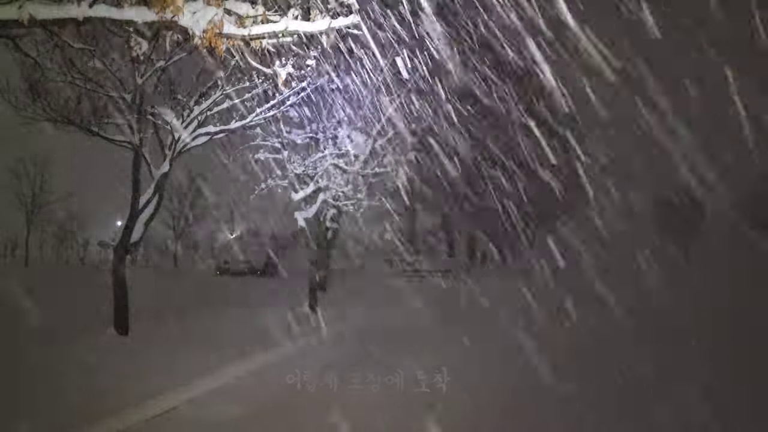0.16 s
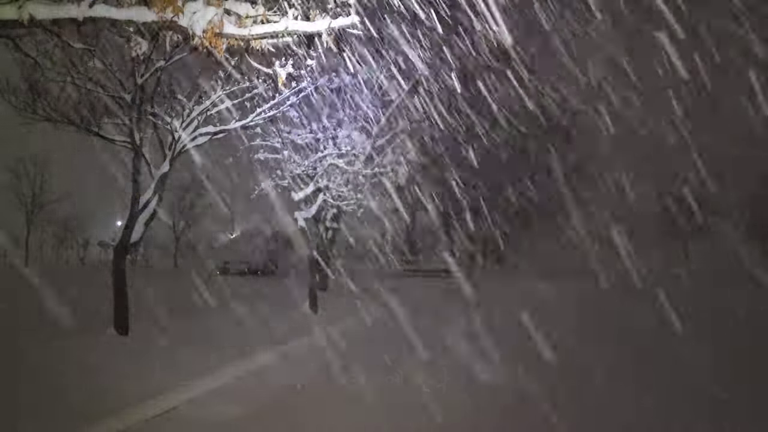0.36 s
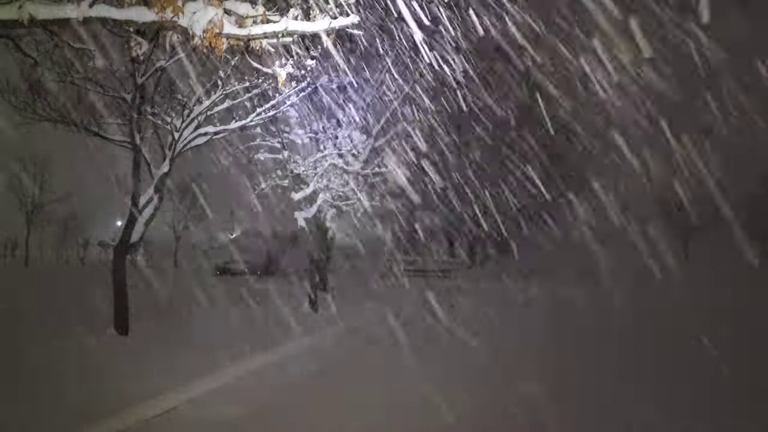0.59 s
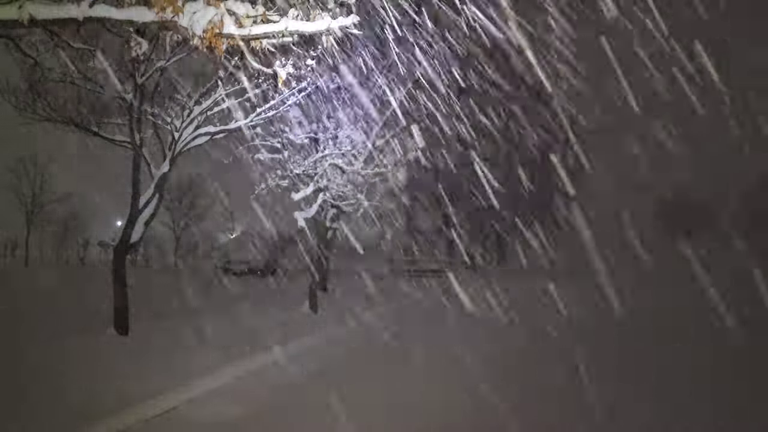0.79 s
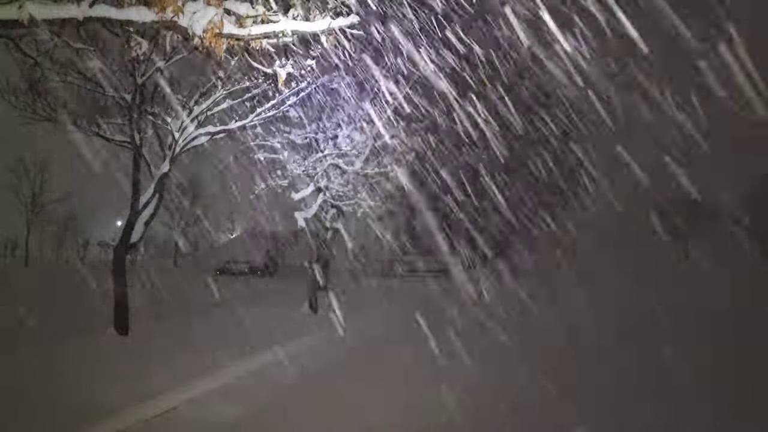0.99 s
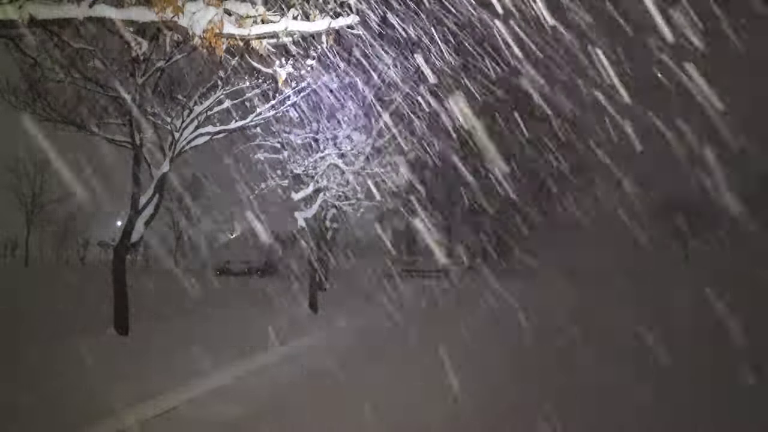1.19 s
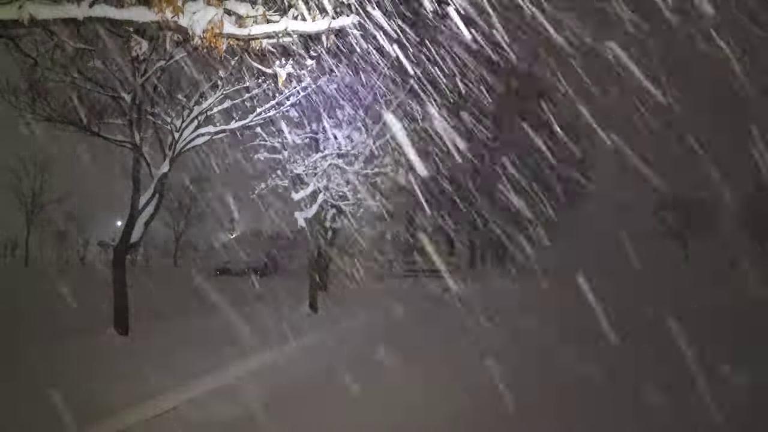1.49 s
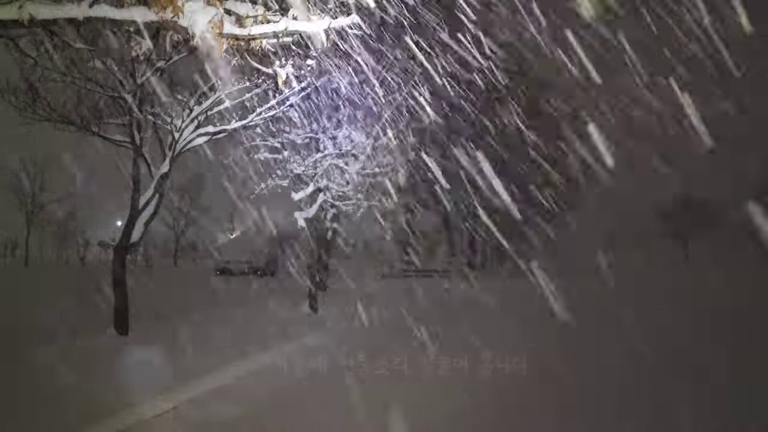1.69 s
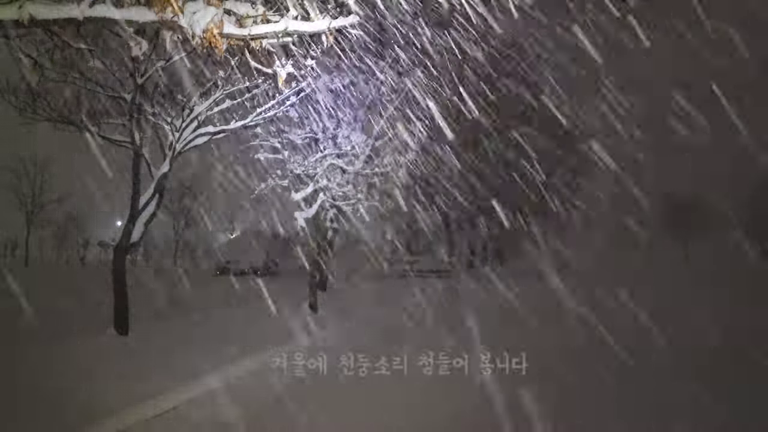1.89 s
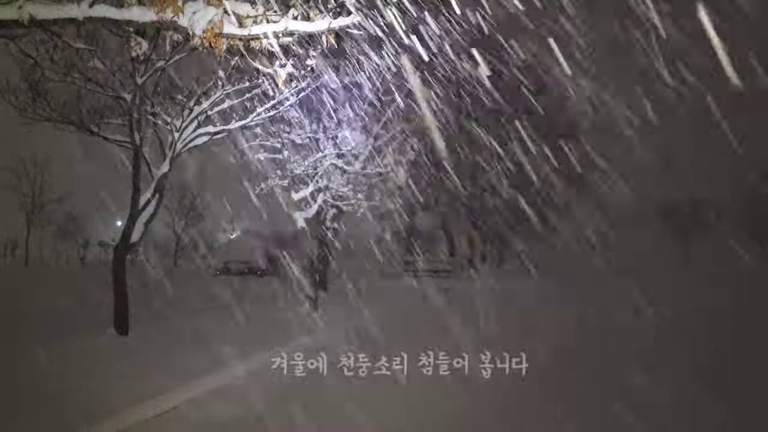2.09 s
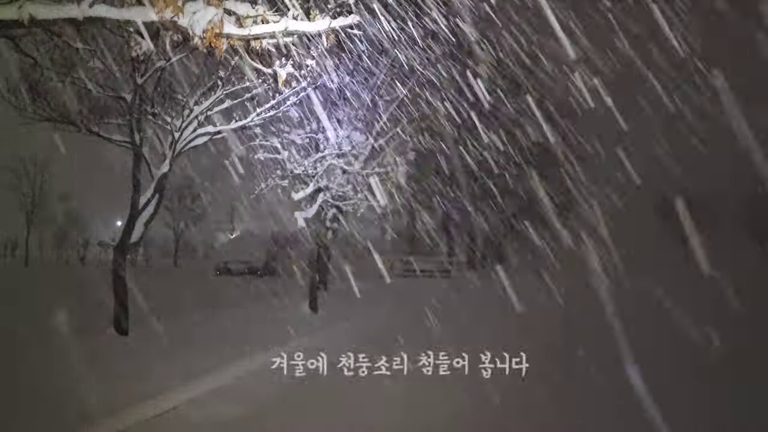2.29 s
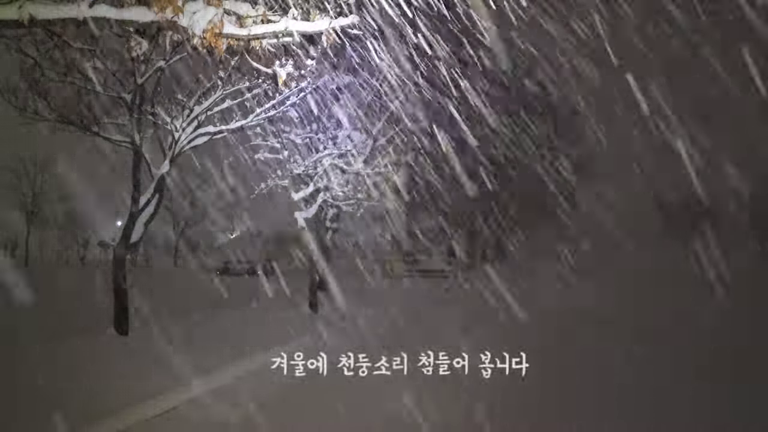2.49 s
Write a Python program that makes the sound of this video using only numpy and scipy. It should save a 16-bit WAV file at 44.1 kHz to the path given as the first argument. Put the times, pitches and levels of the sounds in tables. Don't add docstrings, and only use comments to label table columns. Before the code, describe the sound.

Thunder strikes suddenly after a brief quiet moment, with rough rips, low booms and hollow claps that roll on and fade; faint snowflake ticks and a distant low drone, outdoors at night, close stereo microphones.

```python
import sys
import numpy as np
from scipy import signal
from scipy.fft import rfft, irfft
from scipy.io import wavfile
from scipy.ndimage import uniform_filter1d

SR = 44100
rng = np.random.default_rng(int(sys.argv[2]) if len(sys.argv) > 2 else 0)


def generate_wav(signal):
    frames = np.transpose(np.atleast_2d(signal))
    scaled = np.clip(frames, -1, 1) * 32767
    pcm = np.round(scaled).astype(np.int16)
    wavfile.write(sys.argv[1], SR, pcm)


def field_ratio(decibels):
    return 10 ** (np.asarray(decibels, dtype=float) / 20)


N = 116865


def evened(x):
    return x / np.sqrt(np.mean(x ** 2) + 1e-20)


def read(points, hz):
    f, value = np.transpose(points)
    return np.interp(np.log(hz + 1), np.log(f + 1), value)


def add(mix, start_s, sound):
    part = mix[..., round(start_s * SR):][..., :sound.shape[-1]]
    part += sound[..., :part.shape[-1]]


def colour(x, points):
    level_db = np.maximum(read(points, abs(np.fft.fftfreq(16384, 1 / SR))), -100)
    log_gain = np.log(field_ratio(level_db))
    taps = np.fft.ifft(np.exp(np.conj(signal.hilbert(log_gain)))).real[:6000]
    shaped = taps.reshape((1,) * (x.ndim - 1) + (-1,))
    return signal.oaconvolve(x, shaped, axes=-1)[..., :x.shape[-1]] / np.linalg.norm(taps)


def clicks(per_s, spread_db):
    size = field_ratio(spread_db * np.minimum(rng.exponential(1, N), 5))
    sign = rng.choice([-1., 1.], N)
    return evened(size * sign * (rng.random(N) < per_s / SR))


# start_s, level_db, deep_db (low shocks over bright ones)
ROLL = [(.2, -40.5, 10), (.22, -37, 6.5), (.36, -41, 6), (.41, -41, 9), (.45, -36, 6), (.6, -34.5, 6),
        (0.646, -33.5, 3.5), (0.676, -35.5, 8.5), (.91, -42, 4), (1.03, -39, 6.5), (1.07, -38, 8.5),
        (1.2, -37.5, 9), (1.52, -41, 3.5), (1.68, -43, 4.5), (2.04, -45, 3.5), (2.07, -40.5, 9),
        (2.3, -44.5, 5), (2.65, -45.5, 2)]
# pitch_hz, level_db per Hz
DEEP_SPECTRUM = [(18, -33), (30, -9.5), (54, -8), (135, 0.5), (242, -2.5), (305, -15), (330, -29),
                 (430, -30), (730, -120)]
# pitch_hz, level_db per Hz
CRACK_SPECTRUM = [(190, -35.5), (320, -8.5), (412, -2), (589, -10.5), (724, -10), (1170, -15.5),
                  (1640, -22), (2110, -23), (5000, -54), (6500, -89), (11000, -120)]
ARRIVAL_S, ATTACK_S = 0.1878, 0.0063
SHOCKS_PER_S, SHOCK_SPREAD_DB = 1500, 2
CLUMP_DB, CLUMP_S = 1, 0.033
DEEP_DB, CRACK_DB = 1.5, 4.5
TREBLE_SAG_DB_PER_S, RING_SAG_DB_PER_S = -7.5, -4


def roll():
    t = np.arange(N) / SR
    start_s, level_db, deep_db = np.transpose(ROLL)
    width = max(int(CLUMP_S * SR), 1)
    slow = uniform_filter1d(uniform_filter1d(rng.standard_normal(N), width), width)
    clumps = evened(field_ratio(CLUMP_DB * evened(slow)))
    front = np.clip((t - ARRIVAL_S) / ATTACK_S, 0, 1)
    drive = front * field_ratio(np.interp(t, start_s, level_db)) * clumps

    deep = clicks(SHOCKS_PER_S / 2, SHOCK_SPREAD_DB) * field_ratio(DEEP_DB + np.interp(t, start_s, deep_db))
    bright = clicks(SHOCKS_PER_S * 2, SHOCK_SPREAD_DB) * field_ratio(CRACK_DB)
    crack = colour(drive * bright, CRACK_SPECTRUM) + rips()

    dull = signal.lfilter(*signal.butter(2, 1800 / (SR / 2)), crack)
    treble = (crack - dull) * field_ratio(TREBLE_SAG_DB_PER_S * (np.clip(t, .65, 1.36) - 0.6445))
    ring = signal.lfilter(*signal.iirpeak(410, 3, SR), crack)
    ring_change = ring * (field_ratio(RING_SAG_DB_PER_S * (t - 1.5)) - 1)
    return colour(drive * deep, DEEP_SPECTRUM) + ring_change + dull + treble


# start_s, peak_db, t60_s
RIPS = [(0.205, -28, 0.22), (0.415, -28.5, 0.3), (0.461, -29.5, 0.3), (0.623, -21, 0.22),
        (0.644, -20, 0.17), (0.779, -21.5, 0.13), (0.869, -32.5, 0.42), (0.945, -27, 0.24),
        (1.056, -22.5, 0.19), (1.123, -33, 0.48), (1.179, -21.5, 0.25), (1.259, -33.5, 0.16),
        (1.309, -26.5, 0.26), (1.393, -24, 0.28), (1.47, -41, 0.23), (1.518, -26, 0.26), (1.591, -45, 0.28),
        (1.734, -32.5, 0.23), (1.811, -36.5, 0.43), (1.886, -32, 0.25), (2.063, -40, 0.098),
        (2.096, -38, 0.15), (2.169, -32, 0.4), (2.257, -34, 0.14), (2.335, -41, 0.18)]
# pitch_hz, level_db per Hz
RIP_SPECTRUM = [(300, -26), (700, 1.5), (1000, 3), (1500, -3.5), (2500, -13.5), (4000, -27), (5500, -39.5),
                (8000, -77.5)]
RIP_DB, RIP_RISE_S = -10.5, 0.002058


def rips():
    out, t = np.zeros(N), np.arange(8000) / SR
    for start_s, peak_db, t60_s in RIPS:
        rise = np.minimum(t / RIP_RISE_S, 1)
        decay = field_ratio(peak_db + RIP_DB - 60 * t / max(t60_s, .02))
        add(out, start_s - RIP_RISE_S, rise * decay * rng.standard_normal(8000))
    return colour(out, RIP_SPECTRUM)


# start_s, peak_db, pitch_hz, length_s
BOOMS = [(0.242, -25, 113.5, 0.022), (0.276, -19, 126.7, 0.029), (0.588, -10, 129, 0.011),
         (0.614, -9, 139.6, 0.01), (.878, -21.5, 184, .014), (.917, -18, 116, .018), (.94, -18, 190, .012),
         (1.05, -16, 199, 0.018), (1.095, -28.5, 170, 0.011), (1.164, -19.5, 205, 0.02),
         (1.187, -11.5, 235, 0.018), (1.292, -20, 174, 0.009), (1.308, -14.5, 234, 0.017),
         (1.359, -20.5, 121.5, 0.054), (1.405, -17.5, 253, 0.013), (1.469, -24, 126, 0.029),
         (1.494, -20, 259, 0.016), (1.52, -19, 228, 0.0096), (1.597, -27, 244, 0.021),
         (1.636, -26.5, 251, 0.017), (1.8, -29.5, 217, 0.014), (1.832, -28, 178, 0.024),
         (2.059, -24.5, 252, 0.019), (2.079, -21.5, 250, 0.021), (2.105, -25, 89, 0.027),
         (2.128, -25.5, 251, 0.027), (2.15, -36, 184, .015), (2.169, -24.5, 246, 0.025),
         (2.192, -24, 150, 0.015), (2.237, -25, 236, 0.012), (2.265, -24, 89, 0.028),
         (2.31, -34, 73.5, 0.038), (2.35, -26, 80, 0.011)]
# start_s, peak_db, pitch_hz, length_s
CLAPS = [(0.195, -20, 435, 0.014), (0.288, -29.5, 417, 0.024), (0.417, -21.5, 505, 0.019),
         (0.428, -19, 409, 0.025), (0.462, -20, 393, 0.021), (0.503, -13, 404.6, 0.033),
         (0.529, -12, 418, 0.016), (0.632, -17.5, 427, 0.025), (0.717, -22, 364, 0.022),
         (0.776, -13.5, 396.5, 0.019), (.875, -27, 406, .02), (.925, -24, 452, 0.012),
         (.95, -29.5, 385, .03), (1.06, -21.5, 442, 0.0097), (1.08, -27, 393, 0.025),
         (1.133, -20, 421, 0.02), (1.508, -25.5, 396, 0.031), (1.785, -36, 406, 0.021),
         (1.815, -29.5, 424, 0.023), (1.87, -34, 386, 0.027)]
PITCH_SAG, EDGE_DB, EDGE_T60_S = 0.081, -26, 0.15


def peals(rows, trim_db, rise_share):
    tones, edges = np.zeros(N), np.zeros(N)
    tail = np.arange(4000) / SR
    for start_s, peak_db, pitch_hz, length_s in rows:
        u = np.arange(0, 1, 1 / (SR * 2 * length_s))
        shape = np.minimum(2 * u / rise_share, 1) ** 2 * np.cos(np.pi * u / 2) ** 2
        sagging_hz = pitch_hz * (1 + PITCH_SAG * (.5 - 2 * u))
        cycles = np.sin(2 * np.pi * np.cumsum(sagging_hz) / SR)
        add(tones, start_s, field_ratio(peak_db + trim_db) * shape * cycles)
        edge = field_ratio(peak_db + EDGE_DB - 60 * tail / EDGE_T60_S) * rng.standard_normal(4000)
        add(edges, start_s, edge)
    return tones + colour(edges, CRACK_SPECTRUM)


# start_s, peak_db, length_s
SNAPS = [
    (0.277, -20.5, 0.0054),
    (0.782, -19, 0.0076),
    (1.312, -17, 0.0038),
    (2.114, -17, 0.0068),
    (2.229, -18.5, 0.0048),
    (2.346, -27, 0.0049),
]


def snaps():
    out = np.zeros(N)
    for start_s, peak_db, length_s in SNAPS:
        u = np.arange(-4, 4, 3 / (SR * length_s))
        add(out, start_s - 2 * length_s / 3, -field_ratio(peak_db) * (1 - 2 * u ** 2) * np.exp(-u ** 2))
    return out


# pitch_hz, t60_s
ECHO = [(60, 0.21), (400, 0.16), (3000, 0.19)]
ECHO_DB, ECHO_TURN_S = -10.5, 0.1514


def echoes(x):
    hz, t, z = signal.stft(rng.standard_normal((3, SR // 2)), SR, nperseg=512)
    tails = signal.istft(z * field_ratio(-60 * t / read(ECHO, hz)[:, None]), SR, nperseg=512)[1]
    tails = tails / np.linalg.norm(tails[0])
    phase = np.arange(N) / SR / ECHO_TURN_S / 3 + np.arange(3)[:, None] / 3
    scattered = signal.oaconvolve(x * np.cos(np.pi * phase), tails, axes=1)[:, :N].sum(0)
    return x + field_ratio(ECHO_DB) * scattered


# start_s, peak_db, left_over_right_db
FLAKES = [(0.0712, -65, 4), (0.167, -55, 3.0), (0.2443, -48.5, 3.0), (0.274, -48.5, -2), (0.3746, -49.5, 0),
          (0.4644, -49, -1), (0.486, -52, 4.0), (0.7303, -48.5, 3), (0.8145, -56, 3.0), (0.8377, -50, 1.0),
          (0.9717, -57, 3.5), (1.1842, -54, 3), (1.236, -54, 4), (1.29, -55, 2.5), (1.3513, -52, 1.0),
          (1.482, -51, 3.0), (1.498, -52.5, 4), (1.6317, -54, 3.5), (1.645, -46, -1), (1.7333, -48.5, 1.0),
          (1.7466, -50.5, 1), (1.7824, -55, 1.5), (1.8123, -51, 0.5), (1.848, -54, 1.5), (1.8801, -53, 5),
          (1.934, -62, 3.0), (1.9675, -55, 3.0), (2.0862, -53, 4), (2.096, -56, 1.0), (2.1084, -54, 4),
          (2.2547, -56, 3.5), (2.336, -50, 1.0), (2.346, -55, -2), (2.5457, -51, 1.0)]
# pitch_hz, level_db per Hz
FIZZ_SPECTRUM = [(1760, -28), (3000, -2), (3440, -6), (4050, -7), (5370, -10.5), (7510, -6), (9600, -10),
                 (10600, -15.5), (15400, -15.5)]
FLAKE_RISE_S, FLAKE_T60_S, FLAKE_DB = .0015, 0.031, -1.5
SMALL_PER_S, SMALL_SPREAD_DB, SMALL_DB = 180, 2.5, -2.5
FIZZ_DB = -68


def flakes():
    t, out = np.arange(2500) / SR, np.zeros((2, N))
    shape = np.minimum(t / FLAKE_RISE_S, 1) * field_ratio(-60 * t / FLAKE_T60_S)
    for start_s, peak_db, pan_db in FLAKES:
        puff, tilt = rng.standard_normal((2, 2500)), rng.uniform(-.2, 0.69)
        puff = (puff + tilt * np.roll(puff, 1, axis=1)) / (1 + tilt / 2)
        level = field_ratio(peak_db + FLAKE_DB + np.array([[pan_db], [-pan_db]]) / 2)
        add(out, start_s - FLAKE_RISE_S / 2, level * shape * puff)

    small = np.array([clicks(SMALL_PER_S, SMALL_SPREAD_DB), clicks(SMALL_PER_S, SMALL_SPREAD_DB)])
    swell = np.sqrt(abs(uniform_filter1d(small ** 2 + 0.22 * small[::-1] ** 2, 350, axis=1)))
    fizz = field_ratio(FIZZ_DB) * rng.standard_normal((2, N)) * np.sqrt(1 + (field_ratio(SMALL_DB) * swell) ** 2)
    return colour(out + patchy(fizz), FIZZ_SPECTRUM)


def patchy(x):
    z = signal.stft(x, nperseg=512)[2]
    field = uniform_filter1d(rng.standard_normal(z.shape), size=6, axis=1)
    field = uniform_filter1d(field, size=7, axis=2)
    return signal.istft(z * field_ratio(3.0 * evened(field)), nperseg=512)[1][:, :N]


def fuzzy(hz, width_hz, channels):
    t, size = np.arange(N) / SR, max(int(SR / width_hz / 2), 1)
    slow = uniform_filter1d(rng.standard_normal((2, channels, N)), size)
    a, b = uniform_filter1d(slow, size)
    return evened(a * np.cos(2 * np.pi * hz * t) + b * np.sin(2 * np.pi * hz * t))


# pitch_hz, level_db per Hz
DRONE_SPECTRUM = [(15, -55.5), (25, -25.5), (46, -22.5), (70, -6), (98, -13.5), (209, -21.5), (411, -34),
                  (470, -34.5), (610, -81), (1030, -120)]
# pitch_hz, level_db, width_hz
MOANS = [(557, -65.5, 18), (726, -69.5, 60), (199.8, -53.5, 8.5)]
DRONE_DB = -42
HUM_HZ, HUM_DB, HUM_WIDTH_HZ = 65.57, -44.5, 8.7


def drone():
    rumble = field_ratio(DRONE_DB) * colour(rng.standard_normal(N + SR), DRONE_SPECTRUM)[SR:]
    steady = np.sin(2 * np.pi * HUM_HZ * np.arange(N) / SR)
    hum = field_ratio(HUM_DB) * (steady + fuzzy(HUM_HZ, HUM_WIDTH_HZ, channels=1)[0] / 2)
    moans = sum(field_ratio(db) * fuzzy(hz, width_hz, channels=1)[0] for hz, db, width_hz in MOANS)
    return rumble + hum + moans


# pitch_hz, level_db per Hz
HISS_SPECTRUM = [(24, -40.5), (40, -8), (215, -3.5), (362, -13), (426, -3), (475, -9.5), (1380, -15),
                 (1480, -14), (3000, -21), (3900, -52), (6600, -120)]
# pitch_hz, level_db, width_hz
WHINE = [(1780, -65.5, 29), (1430, -69, 50), (795, -71.5, 110), (2960, -77.5, 25)]
HISS_DB = -61
HISS_OPPOSED, WHINE_OPPOSED = 0.28, 0.53


def hiss_and_whine():
    hiss = field_ratio(HISS_DB) * colour(rng.standard_normal((2, N + SR)), HISS_SPECTRUM)[:, SR:]
    whine = sum(field_ratio(db) * fuzzy(hz, width_hz, channels=2) for hz, db, width_hz in WHINE)
    return hiss - HISS_OPPOSED * hiss[::-1] + whine - WHINE_OPPOSED * whine[::-1]


# pitch_hz, left_over_right_db
LEAN = [(60, -17), (180, -2.5), (550, 10), (1650, 3.5), (4970, 2), (15000, 3)]


def scene():
    booms = peals(BOOMS, trim_db=-1, rise_share=0.38)
    claps = peals(CLAPS, trim_db=-3.5, rise_share=0.33)
    thunder = echoes(roll() + snaps() + booms + claps)
    lean = field_ratio(np.array([[.5], [-.5]]) * read(LEAN, np.fft.rfftfreq(N, 1 / SR)))
    return thunder + drone() + irfft(rfft(hiss_and_whine() + flakes()) * lean, N)


def top_cut(x):
    return signal.sosfilt(signal.butter(12, 16450, fs=SR, output="sos"), x)


# pitch_hz, level_db under the middle
SIDE_KEPT = [(100, -33), (550, -25), (750, -30), (1100, -13), (1600, -40), (1900, -30), (2300, -6),
             (3200, -14), (4500, -22)]
# pitch_hz, level_db relative to their band
SPARSE = [(2500, -30), (5000, -5), (8500, -7), (10500, -1), (14000, -3)]
CEILING, EDGE_HZ = .4, 15700


def record(dry):
    soft = CEILING * np.tanh(dry / CEILING)
    left, right = np.pad(soft, ((0, 0), (4096, 4096)), "reflect", reflect_type="odd")
    hz, t, z = signal.stft(np.array([left + right, left - right]) / 2, SR, nperseg=2048)
    band = np.unique(np.round(np.log2(hz + 600) * 5), return_inverse=True)[1]
    member = (band == np.arange(band.max() + 1)[:, None]) * 1.
    mid, side = (member @ abs(z) ** 2)[:, band]

    wander_db = 7 * rng.standard_normal(mid.shape)[band]
    z[1] *= side > mid * field_ratio(2 * read(SIDE_KEPT, hz)[:, None] + wander_db)
    band_mean = np.array([mid, side]) / member.sum(1)[band, None]
    z *= abs(z) ** 2 > band_mean * field_ratio(2 * read(SPARSE, hz)[:, None])
    z *= (hz < EDGE_HZ)[:, None]
    mid, side = signal.istft(z, SR, nperseg=2048)[1][:, 4096:4096 + N]
    return top_cut(np.array([mid + side, mid - side]))


dry = scene()
out = record(dry)
generate_wav(out)
```